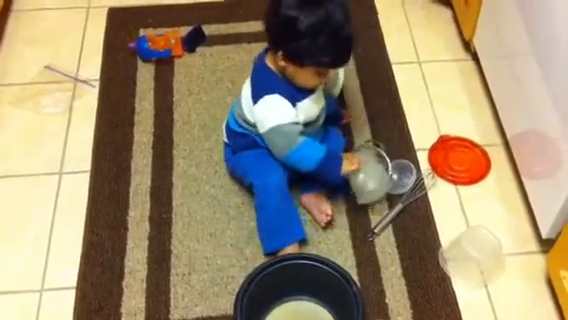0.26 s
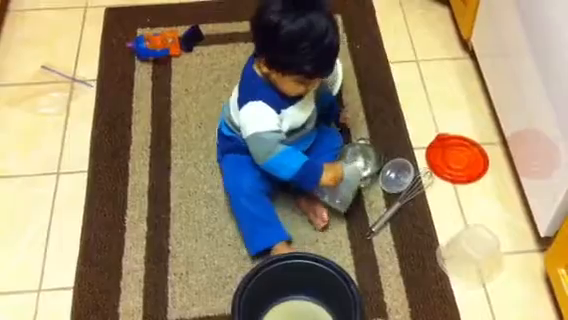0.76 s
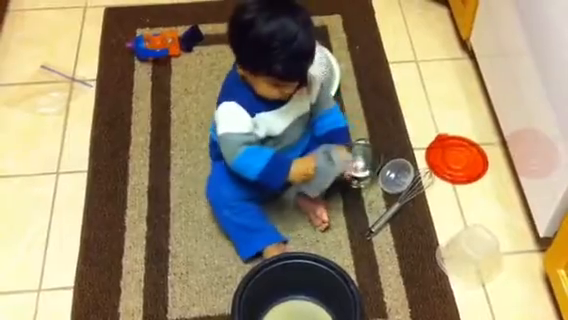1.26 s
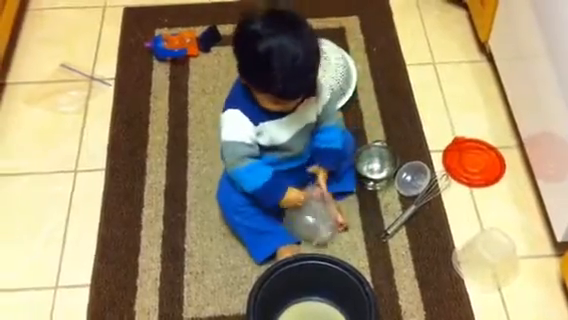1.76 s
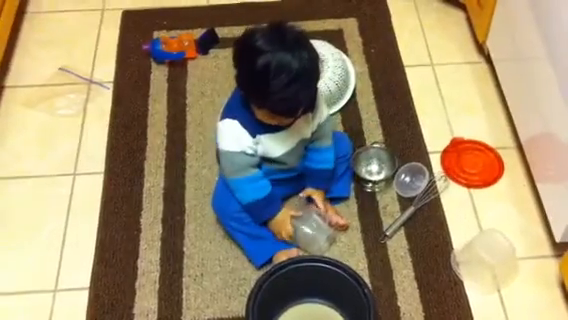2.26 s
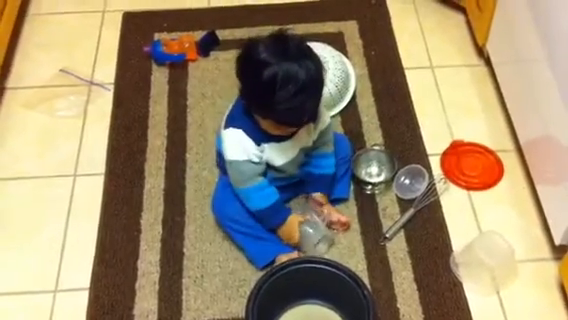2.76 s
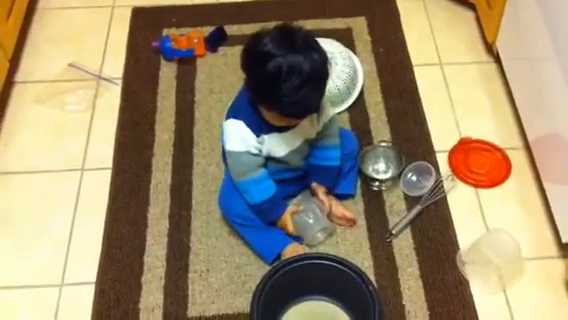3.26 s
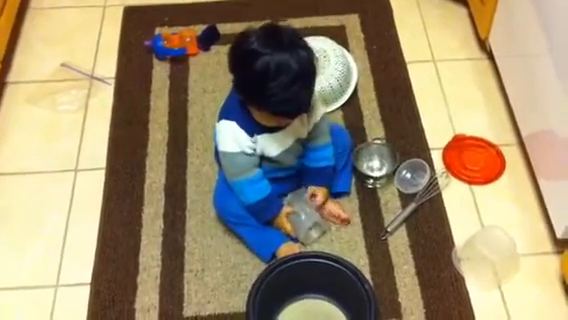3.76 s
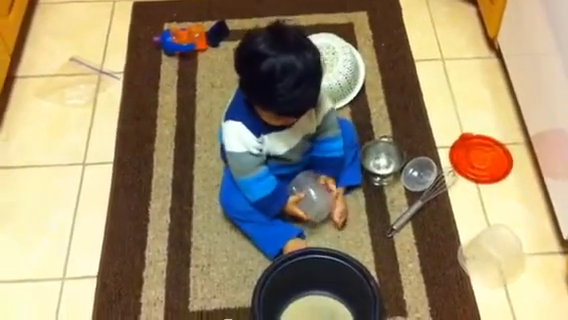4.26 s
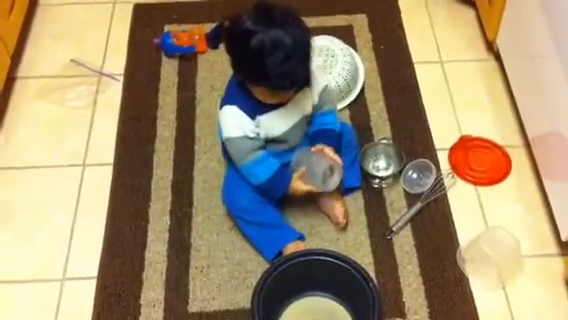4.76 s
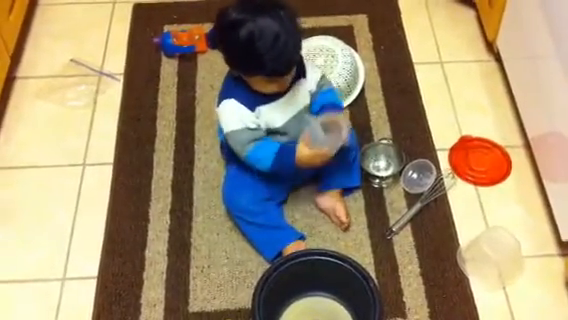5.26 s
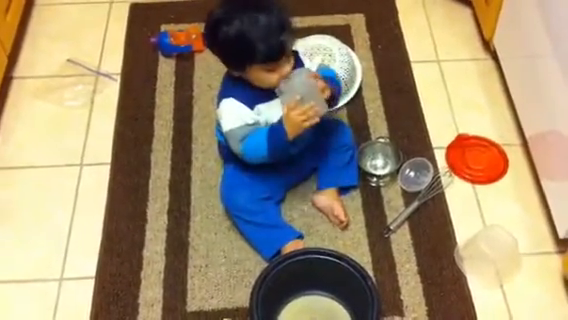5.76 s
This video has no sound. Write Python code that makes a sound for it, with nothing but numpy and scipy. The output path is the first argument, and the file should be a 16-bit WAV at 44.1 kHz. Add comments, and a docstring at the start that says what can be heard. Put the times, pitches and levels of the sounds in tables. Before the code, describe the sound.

Right at the start, a hard plastic jar knocks and scrapes against a steel bowl in a short, bright clatter. A lighter scrape follows at about 0.3 seconds. From 0.5 to 0.6 seconds comes the loudest moment, a quick cluster of hollow knocks that leaves the bowl ringing with a clear metallic tone, fading over a second or two. A smaller knock comes at 0.8 seconds and faint ticks at 1.2. At about 1.9 seconds the jar lands on a rug with a soft, dull thump. From 2.2 seconds until nearly 6, small hands turn the jar, making quiet, irregular plastic taps, nail ticks and brief rubs, clearest around 2.5, 3.1, 3.8 and 5.8 seconds. Everything sounds fairly near, with a short kitchen echo. A faint refrigerator hum and soft room hiss continue throughout.

```python
"""On a kitchen rug, a small child bumps and drags a hard plastic jar against a steel bowl, which rings on.
The jar thumps on the rug, then is turned, tapped and rubbed in small hands. A refrigerator hums.
Each blow sets an object ringing at its own fading tones, called modes; dragging and rubbing are
thousands of tiny slips. A ring time (t60) is how long a sound takes to fade by 60 dB."""
import sys
import numpy as np
from scipy import signal
from scipy.fft import rfft, irfft
from scipy.io import wavfile

SR = 44100
rng = np.random.default_rng(int(sys.argv[2]) if len(sys.argv) > 2 else 0)


def dump(signal):
    """Clip the signal to [-1, 1] and save it as 16-bit WAV at the path in sys.argv[1]."""
    limited = np.clip(np.atleast_2d(signal).T, -1, 1)
    pcm = np.round(limited * 32767).astype(np.int16)
    wavfile.write(sys.argv[1], SR, pcm)


N = 264159

# The plastic jar's modes. Each row: pitch in Hz, relative level in dB, ring time in seconds.
JAR_MODES = [(1080, -14.5, 0.14), (2490, -21, 0.12), (2640, 3, 0.11), (2665, -10.5, 0.049),
             (3380, -3, 0.056), (3300, -5, 0.034), (3538, -7.5, 0.12), (3670, -16, 0.067),
             (4260, -4, 0.053), (4470, -15, 0.044), (4560, -14.5, 0.076), (5190, -10.5, 0.056),
             (6280, -16, 0.035)]


def jar_on_bowl():
    """Knocks and tiny slips shake the jar, its hollow body and the thin walls of both jar and bowl."""
    # Each row: time in seconds, strength in dB for the jar, then for its hollow body.
    knocks = [(.0282, -28.5, -70), (.0338, -26, -71.5), (0.0441, -29, -45), (.0897, -32, -58),
              (0.1338, -53, -60), (0.3516, -38.5, -62), (0.5201, -27.5, -70), (0.5465, -25, -37),
              (.5545, -39, -42), (0.5621, -18.5, -54), (0.5864, -20, -43), (0.5992, -21, -63),
              (0.6188, -33, -42.5), (.7815, -38.5, -48), (0.7965, -44, -48)]
    # Each row: start and length in seconds, then strength in dB of jar, scuff and first-touch treble.
    drags = [(0.025, 0.068, -36.5, -40.5, -45), (0.13, 0.097, -53.5, -53, -70),
             (0.308, 0.15, -48.5, -50.5, -62), (0.517, .025, -40.5, -50, -34.5),
             (0.547, 0.049, -35.5, -36, -26)]
    # Each row: pitch in Hz, relative level in dB, ring time in seconds.
    hollow_modes = [(473, -12, 0.1), (633, -6.5, 0.12), (731, -0.5, 0.063), (773, -5, 0.15),
                    (1041, -13, 0.22), (1395, -22, 0.115), (1683, -9, 0.11)]
    # The tone of the scraping. Each row: frequency in Hz, relative level in dB.
    scuff_spectrum = [(120, -62), (200, -37), (745, -11), (894, -15), (1600, 1), (2030, -18.5), (2620, -2),
                      (2870, -3), (5160, -17), (15700, -39.5)]
    starts, lengths, jar_db, scuff_db, treble_db = np.transpose(drags)
    shape = dict(attack_s=0.005, release_db_per_s=304)
    jar_drag = strokes(starts, lengths, jar_db, **shape)
    scuff_drag = strokes(starts, lengths, scuff_db, **shape)
    treble_drag = strokes(starts, lengths, treble_db, **shape, fade_db_per_s=194)
    times, knock_db, hollow_db = np.transpose(knocks)
    slips = grains(per_s=1500, spread_db=3.5)
    jar = sum(struck(JAR_MODES, times, knock_db - 18.5, slips * jar_drag * from_db(-31.5)))
    hollow = sum(struck(hollow_modes, times, hollow_db, slips * scuff_drag * from_db(-39)))
    bodies = filtered(jar + hollow, "highpass", hz=420, order=3)   # small bodies give no bass
    scuff = rms_one(coloured(grains(per_s=5000, spread_db=3.5), scuff_spectrum))
    crack_decay = from_db(-60 / (0.032 * SR))   # each knock's burst of noise fades in 32 ms
    cracks = signal.lfilter([1], [1, -crack_decay], clicks(times, knock_db - 17.5))
    dull = scuff_drag * from_db(-5) * band(scuff, 460, 1340)
    middle = (cracks + jar_drag * from_db(-7)) * band(scuff, 1950, 4900)
    treble = (from_db(13.5) * cracks + treble_drag) * band(np.diff(scuff, prepend=0), 6100, 21400)
    force = dull + middle + treble
    walls = signal.fftconvolve(force, thin_walls(t60_low=0.15, t60_high=0.045))[:N]
    return bodies + from_db(-43) * walls + from_db(-1.5) * force


def thin_walls(t60_low, t60_high):
    """Thin walls answer a click with hundreds of close modes, the high ones dying first."""
    t = np.arange(SR // 3) / SR
    hz = rng.uniform(296.6, 15500, (300, 1))
    t60 = t60_low * (t60_high / t60_low) ** (hz / 15500)
    fades = from_db(rng.normal(0, 4.0, hz.shape) - 60 * t / t60)
    return rms_one(np.sum(fades * np.sin(2 * np.pi * hz * t), axis=0))


def steel_bowl():
    """The knocked bowl rings on; its lowest mode is stilled when it settles on the rug."""
    # Each row: pitch in Hz, relative level in dB, ring time in seconds.
    modes = [(448, -15, 2.5), (768, -18, 0.8), (1010, -31, 0.27), (1150.7, -5, 1.87), (1290, -11, 1.1),
             (1236.5, -19, 0.88), (1598, -14, 0.88), (2342, -23, 0.17), (2568, -32, 0.53),
             (2700, -13.5, 0.49), (2793, -11, 0.19), (2710, -1, 0.2), (3418, -18.5, 1.05),
             (3580, -11, 0.63), (3740, -20, 0.9), (3846, -13.5, 0.85), (4404, -8.5, 0.39),
             (4630, -17, 0.76), (5020, -12, 0.4), (5210, -3.5, 0.28), (5340, -15, 0.5), (7000, -18, 0.3),
             (8060, -19, 0.28)]
    # Each row: time in seconds, strength in dB, hardness in dB per octave (harder is brighter).
    blows = [(.034, -53, 3), (0.329, -52, -1), (.521, -45.5, 2.5), (.563, -38, 0.16)]
    settle_s, settle_t60_s = 0.771, 0.053
    times, level_db, hardness = np.transpose(blows)
    octaves = np.log2(np.array(modes)[:, :1] / 1000)
    lowest, *higher = struck(modes, times, level_db + hardness * octaves, scatter_db=0.5)
    since_settling = np.maximum(np.arange(N) / SR - settle_s, 0)
    return lowest * from_db(-60 * since_settling / settle_t60_s) + sum(higher)


def rug_thumps():
    """The jar lands softly: a short push rings the floorboards under the rug."""
    # Each row: time in seconds, strength in dB.
    landings = [(1.8602, -34.5), (1.871, -28.5), (1.885, -44), (1.92, -70), (1.944, -56), (1.963, -56)]
    # Each row: pitch in Hz, relative level in dB, ring time in seconds.
    floor_modes = [(160.4, -6, 0.14), (221.5, 2.5, 0.056), (320, -6.5, 0.068), (398.7, -6, 0.044),
                   (492, -21, .05), (658, -15.5, 0.03)]
    times, level_db = np.transpose(landings)
    floor = sum(struck(floor_modes, times, level_db, scatter_db=0.5))
    push = np.hanning(round(0.0018 * SR))
    return np.convolve(floor, push / push.sum())[:N]


def finger_taps():
    """Fingers tap the held jar; the grip shortens its ring and shifts each mode's pitch and level. The rings at
    4.06 s and 4.1046 s are the jar set ringing by a rubbing palm rather than by a tap."""
    # Each row: time in seconds, strength in dB, main and lowest pitch in Hz, # then extra dB for the lowest
    # mode and for the upper modes. The rows at 4.06 s and 4.1046 s are the jar rung by rubbing.
    taps = [(2.1815, -60, 2647, 1110, -20, -1.5), (2.364, -70.5, 2660, 1080, 4, -5),
            (2.4637, -56, 2643, 1100, 7, -5), (2.546, -71, 2565, 1100, 2, 2),
            (3.0495, -54.5, 2705, 1010, -20, -8), (3.0724, -51, 2624, 1023, 3.5, 0.5),
            (3.274, -69, 2670, 1110, 5, 3), (3.36, -66, 2520, 1100, 9, -5.5),
            (3.765, -54.5, 2525, 1120, 10.5, -1), (3.801, -53, 2642, 1130, 4, -5),
            (4.036, -67, 2600, 1100, -8, 2), (4.06, -64, 2540, 1090, -6, 7.5),
            (4.1046, -73, 2530, 1100, -6, 13), (4.527, -58, 2540, 1090, -4, -1)]
    hz, mode_db, t60 = np.transpose(JAR_MODES)
    is_low, is_upper = hz < 2000, hz > 3000
    out, t = np.zeros(N), np.arange(SR // 4)[:, None] / SR
    soft_onset = 1 - np.exp(-t[:, 0] / 0.00043)   # fingertips are soft
    for start, tap_db, main_hz, low_hz, low_db, upper_db in taps:
        bent_hz = np.where(is_low, low_hz, hz * np.where(is_upper, 1.025, main_hz / hz[2]))
        levels_db = mode_db + tap_db + is_low * low_db + is_upper * upper_db + rng.normal(0, 1.1, len(hz))
        touch = finger_contact(seconds=0.016)
        # divide out the touch's push on each mode, so it shapes the attack and the grip sets the level
        push = np.maximum(np.abs(touch @ np.exp(-2j * np.pi * bent_hz * t[:len(touch)])), 0.4)
        fades = from_db(levels_db - 70 * t / t60) / push
        ringing = np.sum(fades * np.sin(2 * np.pi * bent_hz * t), axis=1)
        tap = signal.fftconvolve(ringing * soft_onset, touch)
        at = round(start * SR)
        out[at:at + len(tap)] += tap
    return out


def finger_contact(seconds):
    """A sharp first touch, then a brief scratch that swells and dies."""
    n = max(round(seconds * SR), 4)
    swell = np.sin(np.pi * (np.arange(n) / n) ** 0.3) ** 2
    scratch = rms_one(rng.standard_normal(SR // 10)[:n] * swell) / np.sqrt(n)
    scratch[0] = 0.29
    return scratch / np.sqrt(np.sum(scratch ** 2))


def nail_ticks():
    """Nails and edges make small dull ticks, each a dying puff of noise around one pitch."""
    # Each row: time in seconds, strength in dB, pitch in Hz.
    ticks = [(0.7854, -53, 700), (1.1922, -60, 1700), (1.2142, -64.5, 3570), (1.8612, -58, 1610),
             (1.943, -61, 2810), (1.9607, -61, 2800), (2.219, -65, 3720), (3.1916, -61, 1740),
             (3.2099, -65, 1500), (3.3458, -62.5, 2800), (4.3194, -63, 4400), (4.3816, -59, 2930),
             (4.4132, -60, 4330), (5.0794, -65, 3950), (5.1344, -64, 2520), (5.1926, -56, 1590),
             (5.7742, -53, 2300), (5.7752, -55, 3380), (5.8277, -61, 3470)]
    attack_s, t60 = 0.0013, 0.054
    out, t = np.zeros(N), np.arange(SR // 8) / SR
    for start, level_db, hz in ticks:
        puff = rms_one(band(rng.standard_normal(len(t)), hz / 1.24, hz * 1.21))
        at = round(start * SR)
        out[at:at + len(t)] += from_db(level_db - 60 * t / t60) * (1 - np.exp(-t / attack_s)) * puff
    return out


def hand_rubs():
    """Skin slides over plastic and cloth in tiny slips, which also stir the jar's upper modes."""
    # Each row: start and length in seconds, then strength in dB of the bright and the dull part.
    rubs = [(2.772, 0.023, -71.5, -76), (3.185, 0.03, -75.5, -81), (3.58, 0.13, -79.5, -72),
            (3.753, 0.019, -66.5, -69), (4.038, 0.079, -68.5, -74.5), (4.237, 0.11, -79, -78),
            (4.375, 0.026, -69.5, -70.5), (5.063, 0.069, -77.5, -76), (5.809, 0.021, -68.5, -72)]
    squeeze = 1.065   # a rubbing palm stiffens the jar and raises its pitch
    starts, lengths, bright_db, dull_db = np.transpose(rubs)
    shape = dict(attack_s=0.011, release_db_per_s=161)
    slips = grains(per_s=5000, spread_db=4.0)
    stirred = sum(from_db(db) * ring(slips, hz * squeeze, t60 / 3.2) for hz, db, t60 in JAR_MODES[4:])
    skin = rms_one(band(slips, 1500, 9700)) + from_db(0.5) * rms_one(stirred)
    bright = strokes(starts, lengths, bright_db, **shape) * skin
    dull = strokes(starts, lengths, dull_db, **shape) * rms_one(band(slips, 180, 1600))
    return bright + dull


def kitchen_echo(x, dull_t60_s=0.45, treble_t60_s=0.33):
    """A dense tail of echoes builds in a few milliseconds; the treble dies sooner."""
    t = np.arange(SR // 2) / SR
    echoes = rng.standard_normal(len(t))
    dull = filtered(echoes, "lowpass", hz=3000, order=1)
    tail = dull * from_db(-60 * t / dull_t60_s) + (echoes - dull) * from_db(-60 * t / treble_t60_s)
    tail *= 1 - np.exp(-t / 0.0037)
    return signal.fftconvolve(x, tail / np.sqrt(np.sum(tail ** 2)))[:N]


def room_air():
    """A steady hiss over a low rumble that gently swells and dips."""
    # Each row: frequency in Hz, relative level in dB.
    air_spectrum = [(20, -10), (50, -24), (80, -15), (125, -6), (170, 1.5), (250, -5.5), (330, -4.5),
                    (500, -8.5), (1000, -11), (2000, -12), (5000, -16), (10000, -20), (13000, -18.5),
                    (16000, -17.5)]
    air = rms_one(coloured(rng.standard_normal(N), air_spectrum))
    rumble = filtered(air, "lowpass", hz=600)
    return air + rumble * (from_db(1.6 * drift(rate_hz=8)) - 1)


def refrigerator():
    """A hum of a few low tones, each wavering in level."""
    # Each row: pitch in Hz, average level in dB.
    tones = [(120, -91.5), (240, -79), (360, -83), (480, -92)]
    hum, t = np.zeros(N), np.arange(N) / SR
    for hz, db in tones:
        height = np.sqrt(2) * from_db(db + 1.75 * drift(rate_hz=2.2))
        hum += height * np.sin(2 * np.pi * (hz * t + rng.random()))
    return hum


def struck(modes, times, levels_db, rubbing=0, scatter_db=3.5):
    """One signal per mode, rung by blows of slightly random strength plus any rubbing force."""
    blows_db = levels_db + rng.normal(0, scatter_db, (len(times), len(modes))).T
    return [from_db(db) * ring(clicks(times, blow_db) + rubbing, hz, t60)
            for (hz, db, t60), blow_db in zip(modes, blows_db)]


def ring(force, hz, t60):
    """One mode: a click of height 1 starts a fading sine wave of height 1."""
    decay, angle = from_db(-60 / (t60 * SR)), 2 * np.pi * hz / SR
    return signal.lfilter([0, np.sin(angle)], [1, -2 * decay * np.cos(angle), decay ** 2], force + 1e-18)


def clicks(times, levels_db):
    """A one-sample spike for each blow."""
    out = np.zeros(N)
    out[(np.asarray(times) * SR).astype(int)] = from_db(levels_db)
    return out


def grains(per_s, spread_db):
    """Tiny contacts of uneven size at random moments."""
    sizes = from_db(spread_db * np.minimum(rng.exponential(1, N), 4)) * rng.choice([-1, 1], N)
    return rms_one(sizes * (rng.random(N) < per_s / SR))


def strokes(starts, lengths, levels_db, attack_s, release_db_per_s, fade_db_per_s=0):
    """A loudness curve: each stroke swells, holds or fades while the hand moves, then dies away."""
    t = np.arange(N) / SR - starts[:, None]
    loss_db = fade_db_per_s * np.clip(t, 0, lengths[:, None])
    loss_db += release_db_per_s * np.maximum(t - lengths[:, None], 0)
    return np.sum(np.clip(t / attack_s, 0, 1) * from_db(levels_db[:, None] - loss_db), axis=0)


def drift(rate_hz):
    """A slow random wander of typical size 1."""
    r = np.exp(-2 * np.pi * rate_hz / SR)
    return rms_one(signal.lfilter([1], [1, -2 * r, r * r], rng.standard_normal(N + SR))[SR:])


def coloured(x, spectrum):
    """Shapes the tone of x along a curve of (Hz, dB) points."""
    hz, level_db = np.transpose(spectrum)
    grid_hz = np.maximum(np.arange(N // 2 + 1) * SR / N, 1)
    return irfft(rfft(x) * from_db(np.interp(np.log(grid_hz), np.log(hz), level_db)), N)


def filtered(x, kind, hz, order=2):
    """A smooth filter; a higher order cuts more steeply."""
    return signal.sosfilt(signal.butter(order, hz, kind, fs=SR, output="sos"), x)


def band(x, low_hz, high_hz):
    """Keeps what lies between two frequencies."""
    return filtered(x + 1e-18, "bandpass", [low_hz, high_hz])


def from_db(db):
    """Turns decibels into a multiplier."""
    return 10 ** (np.asarray(db) / 20)


def rms_one(x):
    """Scales x to an average size (rms) of 1."""
    return x / np.sqrt(np.mean(x ** 2) + 1e-20)


def scene():
    """The child's play, with its echo and without its deepest bass, over the quiet room."""
    play = jar_on_bowl() + finger_taps() + nail_ticks() + hand_rubs() + rug_thumps()
    play = play + from_db(-6.5) * kitchen_echo(play) + steel_bowl()
    play = filtered(play, "highpass", hz=156, order=4)
    return (play + from_db(-68) * room_air() + refrigerator())[None]


def record(dry):
    """Cuts away the very highest treble."""
    cutoff_hz = 15900
    return signal.sosfilt(signal.ellip(16, 1, 60, cutoff_hz, fs=SR, output="sos"), dry)


dry = scene()
out = record(dry)
dump(out)
```